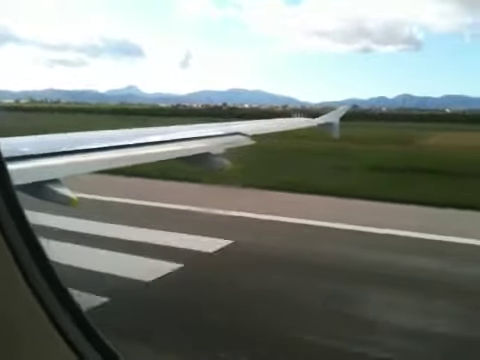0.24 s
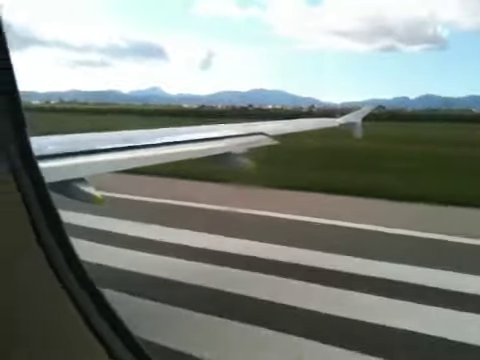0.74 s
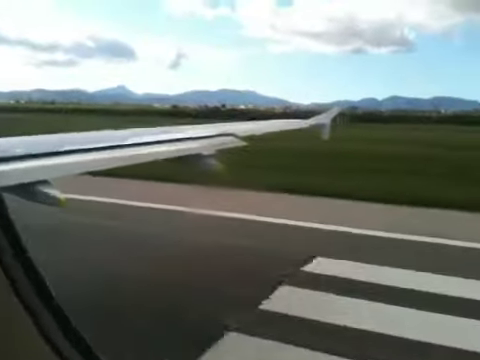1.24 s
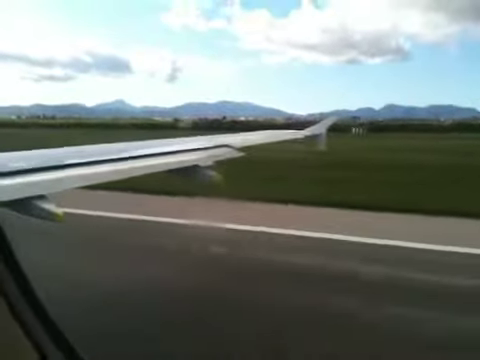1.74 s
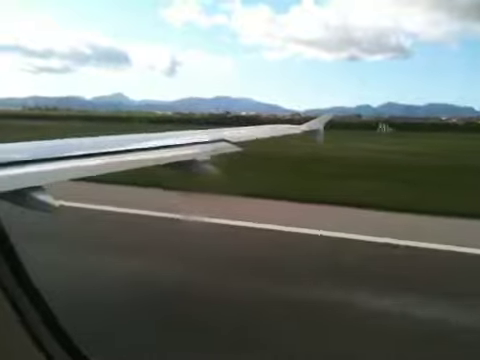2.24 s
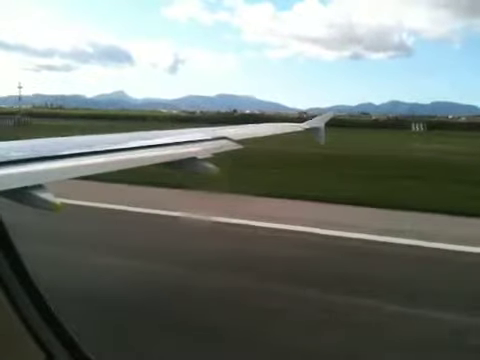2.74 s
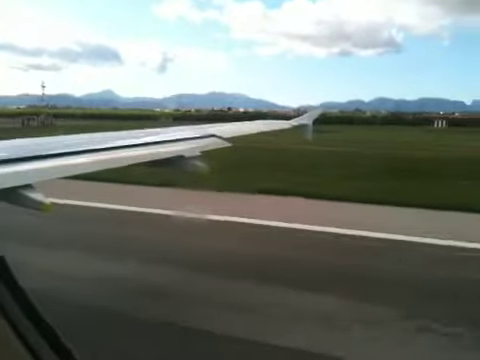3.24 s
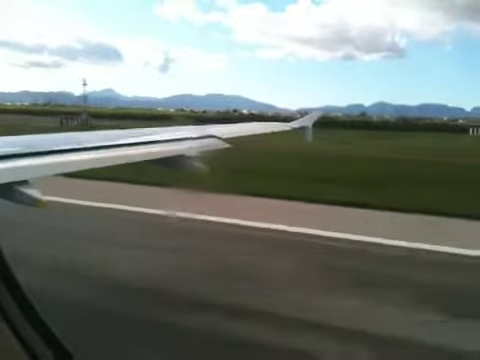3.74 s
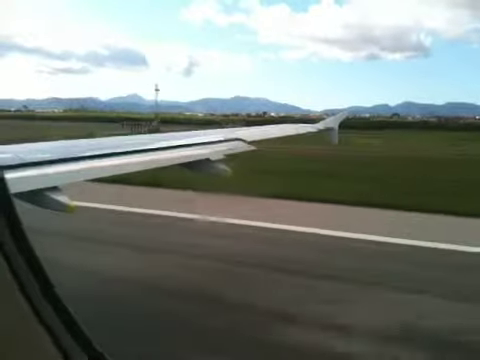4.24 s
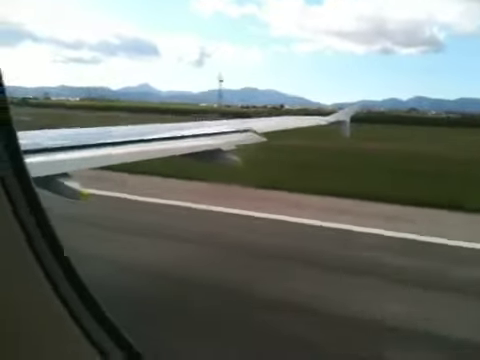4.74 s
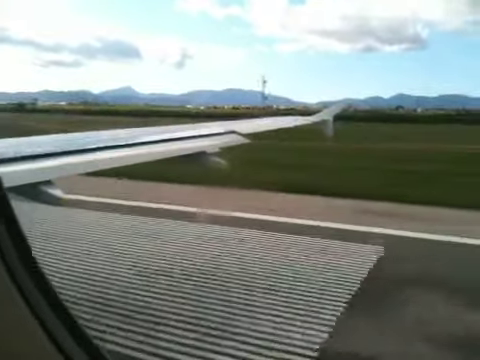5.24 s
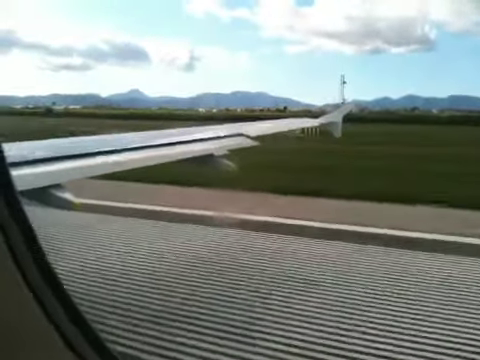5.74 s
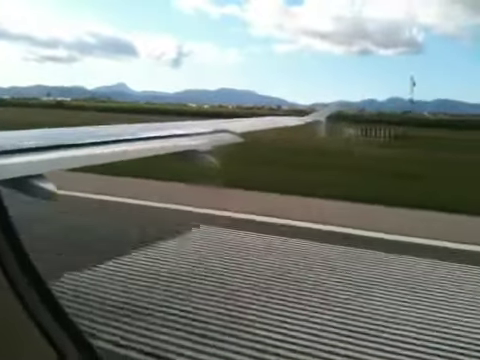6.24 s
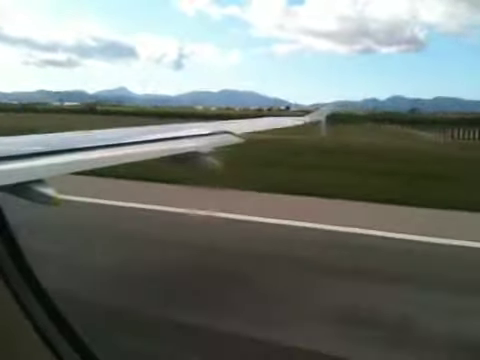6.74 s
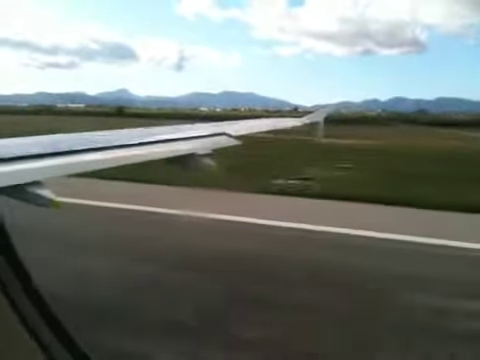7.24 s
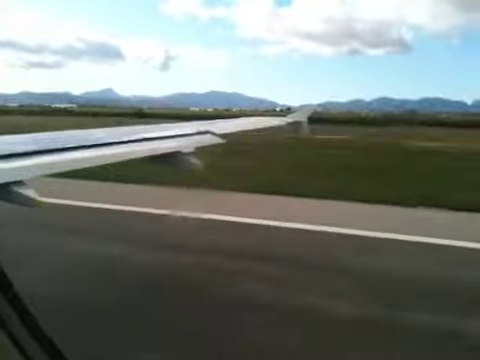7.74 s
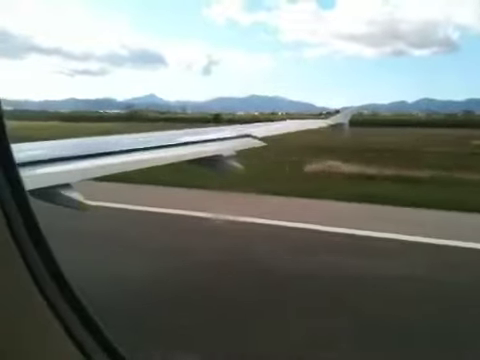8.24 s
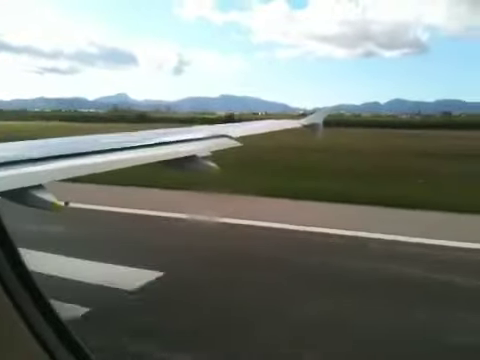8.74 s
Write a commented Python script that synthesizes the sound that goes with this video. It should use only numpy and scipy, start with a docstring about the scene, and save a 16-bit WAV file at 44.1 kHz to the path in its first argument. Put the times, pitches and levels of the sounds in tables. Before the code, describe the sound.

Inside an airliner cabin on the takeoff roll, a steady booming jet roar and wheel rumble with rushing air and plastic panels rattling and ticking.

```python
"""Inside an airliner cabin on the takeoff roll, heard by a small handheld microphone with a peak limiter.
From the start jet roar and wheel rumble boom through the wall, air rushes and cabin power whines faintly.
Plastic trim panels chatter and tick throughout; the ticks, filtered bursts, are thickest in the first 4 s.
Brief uneven bumps in the roar, short decaying tones near 560 Hz, come mostly before 4 s, some in clusters.
Four soft swells of filtered hiss pass between 4 and 6 s, while roar and chatter slowly ease."""
import sys
import numpy as np
from scipy import signal
from scipy.io import wavfile
from scipy.ndimage import uniform_filter1d, minimum_filter1d

SR = 44100
rng = np.random.default_rng(int(sys.argv[2]) if len(sys.argv) > 2 else 0)


def output_pcm(signal):
    """Save a mono or channel-first signal as 16-bit PCM at the path in sys.argv[1].

    Samples are clipped to [-1, 1] before scaling.
    """
    pcm = np.clip(np.atleast_2d(signal).T, -1, 1) * 32767
    wavfile.write(sys.argv[1], SR, np.round(pcm).astype(np.int16))


def makeup_ratio(level_db):
    """Linear amplitude ratio for a level in decibels (20 dB per factor of ten)."""
    decades = np.asarray(level_db, float) / 20
    return 10 ** decades


N = 396459  # samples, about 9 s

# The clearest ticks of the trim panels. Each row: time halfway up the rise in seconds,
# peak level in dB before the cabin's echo, brightness in dB per octave.
PANEL_TICKS = [(0.0416, -27, -2), (0.077, -16, -1), (0.082, -23, -1), (0.3071, -27, 0), (0.3882, -23.5, -3),
               (0.536, -23, -2), (0.5466, -19.5, -4), (0.5662, -24, -2), (0.754, -20.5, 0),
               (0.8045, -27, -5), (0.809, -27, -2), (0.8135, -20, -4), (0.829, -28, -2), (0.8385, -30, -1),
               (0.8578, -13.5, -2.5), (0.8625, -17, -4), (0.866, -24, -10), (0.886, -24, -6),
               (0.9145, -25, 0), (0.9603, -26, -1), (0.9734, -21, -5), (1.0, -25, -2), (1.0343, -29, -2),
               (1.1326, -20.5, -3), (1.325, -22, -6), (1.3386, -27, -2), (1.342, -20, -11),
               (1.402, -24, -5), (2.056, -19, -2), (2.1085, -29, -2), (2.127, -24, -1), (2.1377, -29, -2),
               (2.1954, -28, -2), (2.215, -19, -4.5), (2.2302, -26, -2), (2.504, -30, 1), (2.5238, -26, -2),
               (2.5795, -27, -2), (2.599, -24, -3), (2.7512, -24, -2), (3.0173, -30, -1), (3.0282, -24, -3),
               (3.216, -33, -2), (3.232, -31, -2), (3.255, -22, -1), (3.2572, -27, -3), (3.264, -22.5, 0),
               (3.2665, -23, -9), (3.274, -32, -2), (3.283, -25, 0), (3.316, -24, -3), (3.356, -31, -6),
               (3.37, -25, -2.5), (3.4599, -27, 0), (3.501, -21, -7), (3.511, -28, 1), (3.5368, -29, -2),
               (3.6175, -29, -1), (3.7773, -27, -1), (3.8159, -19, -3.5), (4.279, -29, -1),
               (4.3342, -34, -2), (4.494, -20.5, -3.5), (4.63, -26, -2), (4.759, -24, -2), (4.775, -24, -3),
               (4.7926, -29, -3), (4.9168, -29, -2), (5.1888, -24, -3), (5.227, -24, -3), (5.316, -27, -2),
               (5.39, -29, 2), (5.539, -33, -6), (5.557, -28, 3), (5.593, -21.5, -2), (5.722, -25, -8),
               (6.124, -27, -5), (6.4139, -29, 0), (6.905, -26, 1), (7.0573, -26, -1), (7.1491, -28, -2),
               (7.2157, -25, -5), (7.278, -22, -2), (7.2885, -28, 0), (7.38, -27, -1), (7.8147, -29, -2),
               (7.9537, -27, -2), (8.2595, -29, -1), (8.642, -25, -6), (8.6549, -27, -2), (8.8378, -25, -3)]


def evened(x):
    """Scales to rms 1."""
    return x / np.sqrt(np.mean(x ** 2) + 1e-20)


def smoothed_twice(x, size):
    """Two running means over size samples."""
    return uniform_filter1d(uniform_filter1d(x, size=size), size=size)


def resonance(hz, width):
    """Filter of one ring with gain 1 at its centre."""
    return signal.iirpeak(min(hz, 20000), hz / max(width, 5), SR)


def narrow(hz, width):
    """Noise that has passed one resonance twice, at rms 1."""
    ring = resonance(hz, width)
    once = signal.lfilter(*ring, rng.standard_normal(N))
    return evened(signal.lfilter(*ring, once))


def noise(spectrum, size, patchy_db, flicker_db):
    """Random short-time spectra with drifting patches and a flicker shared by all frequencies."""
    frames, hz = 4 * N // size + 5, np.fft.rfftfreq(size, 1 / SR)
    real, imaginary, patches = rng.standard_normal((frames, len(hz), 3)).T
    patches = uniform_filter1d(patches, size=size // 64, axis=0)  # across frequency
    patches = evened(uniform_filter1d(patches, size=6, axis=1))  # across time
    flicker = evened(uniform_filter1d(rng.standard_normal(frames), size=3))
    f, db = np.transpose(spectrum)
    colour_db = np.interp(np.log(hz + 1), np.log(f + 1), db)[:, None]
    level = makeup_ratio(colour_db + patchy_db * patches + flicker_db * flicker)
    z = (real + 1j * imaginary) * level
    return evened(signal.istft(z, nperseg=size, noverlap=3 * size // 4)[1][:N])


def whine():
    """Overtones of the cabin power: thin steady sines."""
    # Each row: frequency in Hz, level in dB rms.
    overtones = [(11946, -80), (12742, -76), (13539, -85)]
    t = np.arange(N) / SR
    return sum(makeup_ratio(db) * np.sqrt(2) * np.sin(2 * np.pi * (hz * t + rng.random())) for hz, db in overtones)


def hiss():
    """Brief airy swells of narrow noise with long soft flanks."""
    # Each row: middle in seconds, time from the middle to 11.5 dB below it in seconds,
    # centre in Hz, width of the resonance in Hz, level at the middle in dB rms.
    swells = [(4.275, .07, 9800, 3200, -47), (4.59, 0.07, 8200, 3500, -50), (5.525, 0.034, 2480, 280, -38),
              (5.68, .035, 8200, 4000, -47)]
    grain_db = 4  # flutter from one millisecond to the next
    t = np.arange(N) / SR
    grain = makeup_ratio(grain_db * evened(uniform_filter1d(rng.standard_normal(N), size=120)))
    out = np.zeros(N)
    for s, half, hz, width, db in swells:
        swell = 1 / np.cosh(2 * (t - s) / half)
        out += makeup_ratio(db) * swell * narrow(hz, width)
    return evened(grain) * out


def roar():
    """Low boom of jets and wheels, the cabin modes that it excites, and the gusty rush of air above."""
    # Roar through the fuselage wall. Each row: frequency in Hz, relative density in dB per Hz.
    boom_spectrum = [(15, -63), (25, -102), (54, -31), (68, -24), (80, -20.5), (128, -4), (210, -1.5),
                     (286, -5), (396, -13.5), (507, -15.5), (583, -21.5), (1000, -30), (1300, -38.5),
                     (2200, -120)]
    # Air rush and vents. Each row: frequency in Hz, relative density in dB per Hz.
    rush_spectrum = [(350, -48), (600, -2), (993, -14.5), (1120, -13.5), (1300, -6.5), (1430, -10),
                     (1880, -13.5), (2190, -10), (2600, -16.5), (3880, -19.5), (4270, -23.5), (7670, -26),
                     (10300, -30.5), (13200, -45.5), (15600, -60)]
    # Air and wall modes. Each row: centre in Hz, width of the resonance in Hz, level in dB re the boom.
    cabin_modes = [(140.6, 34, -14), (164.4, 48, -16), (206.8, 19.7, -10), (233.2, 21, -15),
                   (286.5, 39, -14)]
    rush_db, gust_db = -23, 0.4  # rush re the boom; its uneven swells, several a second
    start_db, easing_db_per_s = -12.5, -0.1541  # level of the boom
    boom = noise(boom_spectrum, size=4096, patchy_db=0.42, flicker_db=0.38)
    modes = sum(makeup_ratio(db) * narrow(hz, width) for hz, width, db in cabin_modes)
    rush = makeup_ratio(rush_db) * noise(rush_spectrum, size=512, patchy_db=0.8, flicker_db=0.9)
    gusts = evened(smoothed_twice(rng.standard_normal(N), 1500))
    level = makeup_ratio(start_db + easing_db_per_s * np.arange(N) / SR)
    return level * (boom + modes + makeup_ratio(gust_db * gusts) * rush)


def bump(hz):
    """A few cycles that start fast, with a weaker partial near the octave for a sharper edge."""
    rise_s = 0.0012  # from the start to the crest of the envelope
    t = np.arange(1000) / SR
    shape = t / rise_s * np.exp(1 - t / rise_s)
    return shape * (np.sin(2 * np.pi * hz * t) + 0.2 * np.sin(2 * np.pi * 1.93 * hz * t))


def roar_bumps():
    """Brief uneven bumps in the roar, some in close clusters, over fainter random ones: short decaying tones."""
    # The clearest bumps. Each row: start in seconds, level in dB.
    clear_bumps = [(0.306, -11), (0.85, -14), (1.172, -18), (1.596, -12), (1.95, -15), (2.896, -10.5),
                   (2.943, -20), (3.021, -13), (3.077, -16), (3.107, -17), (3.366, -11), (3.371, -14),
                   (3.64, -9), (3.645, -16), (3.651, -12), (3.694, -12), (5.064, -28), (7.786, -14)]
    clear_hz, faint_per_s, faint_db = 563, 40, -44  # faint ones in dB rms
    out = np.zeros(N + 1000)
    for s, db in clear_bumps:
        out[round(s * SR):][:1000] += makeup_ratio(db) * bump(clear_hz)
    starts = rng.random(N) < faint_per_s / SR
    size = makeup_ratio(4 * np.minimum(rng.exponential(1, N), 3)) * starts
    kind = rng.integers(0, 3, N)  # each faint bump takes one of three pitches
    faint = sum(signal.oaconvolve(size * (kind == k), bump(hz))[:N] for k, hz in enumerate((420, 600, 850)))
    return out[:N] + makeup_ratio(faint_db) * evened(faint)


def trim(x, tilt_db):
    """The panels ring briefly in many resonances; tilt_db per octave about 6 kHz sets the brightness."""
    # Rings of the trim panels. Each row: centre in Hz, width in Hz, level in dB before the tilt.
    panel_rings = [(1242, 150, 5.5), (1670, 216, 6.5), (2140, 260, 1), (2730, 290, -4), (3250, 260, -2.5),
                   (3890, 410, -2), (4790, 440, -0.5), (5630, 580, -1), (6640, 440, 2.5), (7680, 990, -0.5),
                   (9400, 2500, -7.5), (11700, 600, -8), (13300, 800, -14), (15400, 900, -19)]
    out = 0
    for k, (hz, width, db) in enumerate(panel_rings):
        gain = makeup_ratio(db + tilt_db * np.log2(hz / 6000))
        out = out + (-1) ** k * gain * signal.lfilter(*resonance(hz, width), x)  # alternating sign
    return out


def shaking_db():
    """Rattle level: a slow calming as the wings take the weight, random fits, a rise around every tick."""
    start_db, calming_db_per_s, fits_db = -44.5, -0.1143, 1  # fits in dB rms
    stir_s, stir_db = 0.039, 1.5  # the jolt behind a tick stirs the chatter: half length, rise
    t = np.arange(0, N / SR + .01, .005)
    fits = evened(sum(np.sin(2 * np.pi * (f * t + rng.random())) for f in np.geomspace(2, 20, num=24)))
    stirred = np.max([np.exp(-((t - s) / stir_s) ** 2) for s, _, _ in PANEL_TICKS], axis=0)
    level_db = start_db + calming_db_per_s * t + fits_db * fits + stir_db * stirred
    return np.interp(np.arange(N) / SR, t, level_db)


def rattle():
    """Dense chatter of loose panels: short scrapes of random size."""
    contacts_per_s, spread_db = 700, 4
    struck = rng.random(N) < contacts_per_s / SR
    size = makeup_ratio(spread_db * np.minimum(rng.exponential(1, N), 2)) * struck
    scrape = signal.lfilter([1], [1, -np.exp(-1 / (0.00045 * SR))], size)  # a contact lasts a ms or two
    return makeup_ratio(shaking_db()) * evened(trim(scrape * rng.standard_normal(N), -2.7))


def ticks():
    """Each tick is a quick scrape with one hard contact at its top, ringing the panels."""
    rise_s, t60_s = 0.0013, 0.0093  # rise of the scrape; its fall by 60 dB
    snap = 1.7  # height of the hard contact re the rms of the scrape at its top
    t, out = np.arange(3000) / SR, np.zeros(N + 3000)
    rise = np.minimum(t / rise_s, 1)
    fall = makeup_ratio(-60 * np.maximum(t - rise_s, 0) / t60_s)
    hard_contact = snap * (np.arange(3000) == round(rise_s * SR))
    bursts = rng.standard_normal((len(PANEL_TICKS), 3000))
    for (s, db, tilt_db), burst in zip(PANEL_TICKS, bursts):
        tick = trim(burst * rise * fall + hard_contact, tilt_db)
        out[round((s - rise_s / 2) * SR):][:3000] += makeup_ratio(db) * tick / abs(tick).max()
    return out[:N]


def echoed(x):
    """Seats and walls of the padded cabin return a short diffuse tail."""
    t60_s, tail_db = 0.083, -12.5
    t = np.arange(4000) / SR
    tail = rng.standard_normal(len(t)) * makeup_ratio(-60 * t / t60_s) * (t > .004)  # first 4 ms stay silent
    return x + makeup_ratio(tail_db) * signal.oaconvolve(x, tail / np.linalg.norm(tail))[:N]


def scene():
    """All sources at one microphone; only the panels get the added echo."""
    panels = echoed(rattle() + ticks())
    return (roar() + roar_bumps() + panels + hiss() + whine())[None]


def low_pass(x):
    """Removes everything above the highest recorded frequency."""
    return signal.sosfilt(signal.butter(12, 15720, fs=SR, output="sos"), x)


def record(dry):
    """The microphone adds its own even hiss and a low cut; a fast limiter holds each tall crest."""
    self_noise_db, low_cut_hz = -70, 51  # noise in dB rms ahead of the low cut
    ceiling = .707  # of full scale
    picked = dry + makeup_ratio(self_noise_db) * rng.standard_normal(dry.shape)
    picked = signal.lfilter(*signal.butter(2, low_cut_hz, 'high', fs=SR), picked)
    allowed = np.minimum(1, ceiling / (abs(picked) + 1e-9))
    held = minimum_filter1d(allowed, size=241)  # the gain dips ahead of a crest and after it
    gain = smoothed_twice(held, 121)
    return low_pass(picked * gain)


dry = scene()
out = record(dry)
output_pcm(out)
```